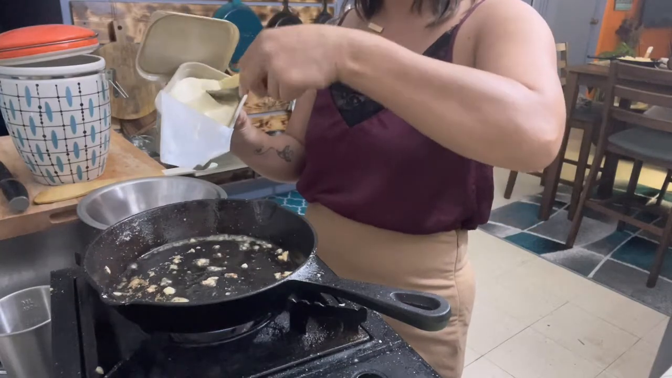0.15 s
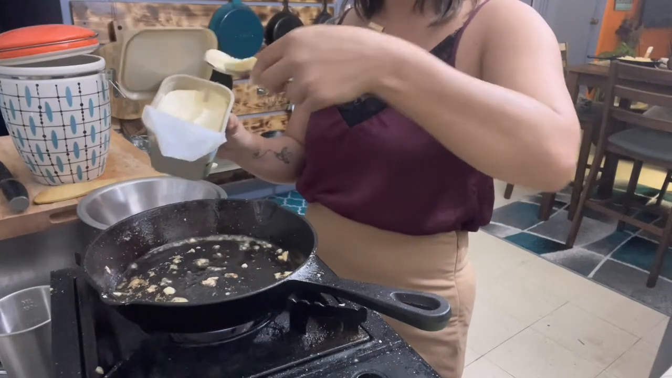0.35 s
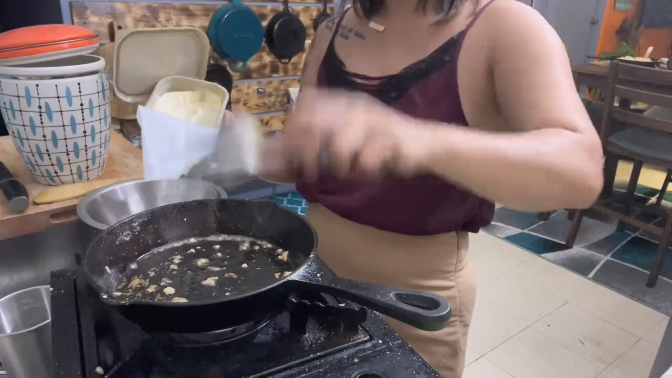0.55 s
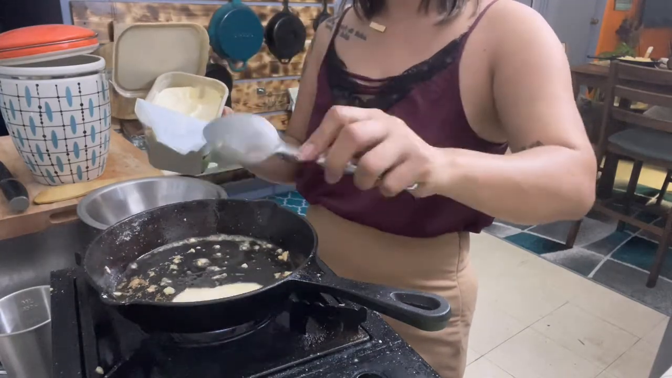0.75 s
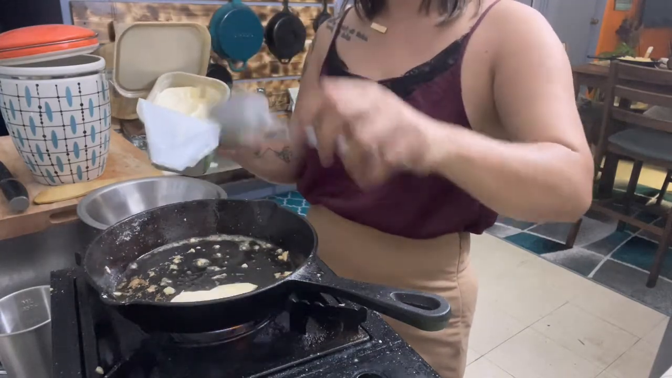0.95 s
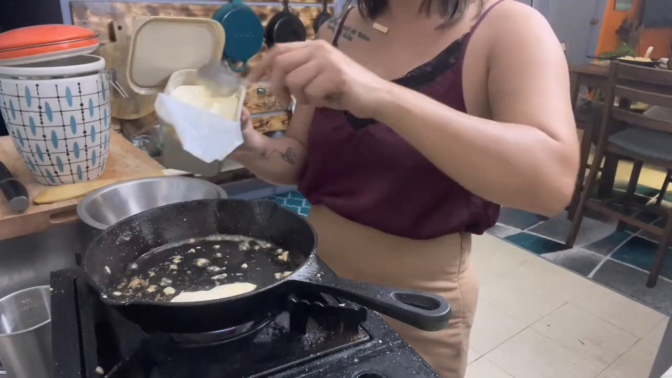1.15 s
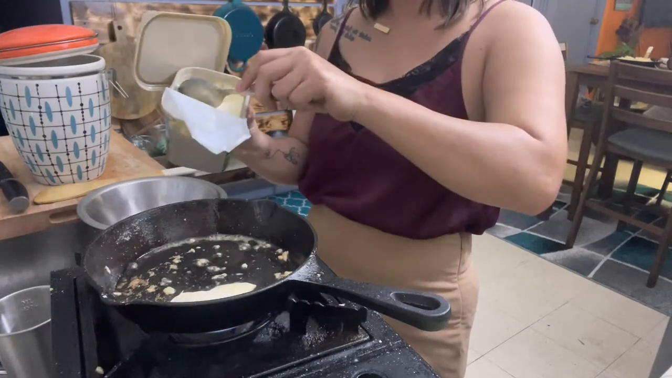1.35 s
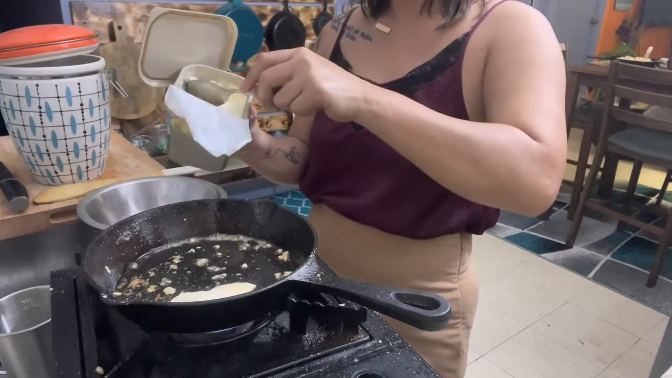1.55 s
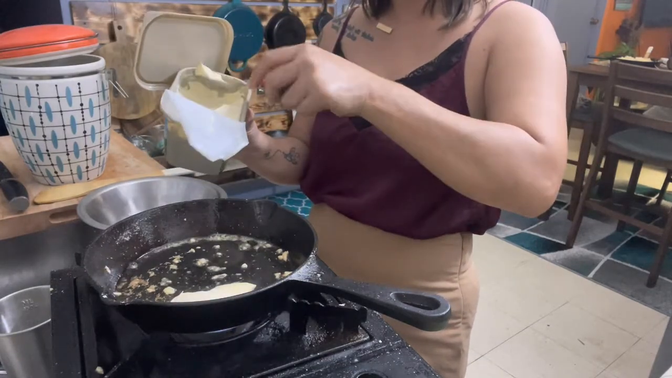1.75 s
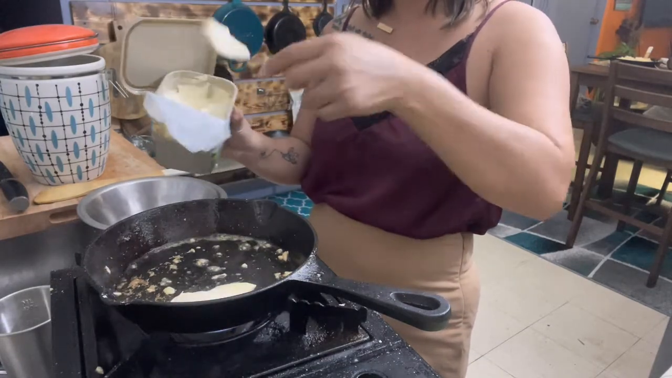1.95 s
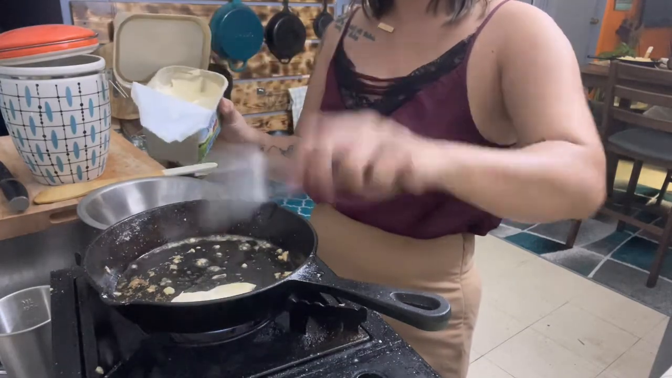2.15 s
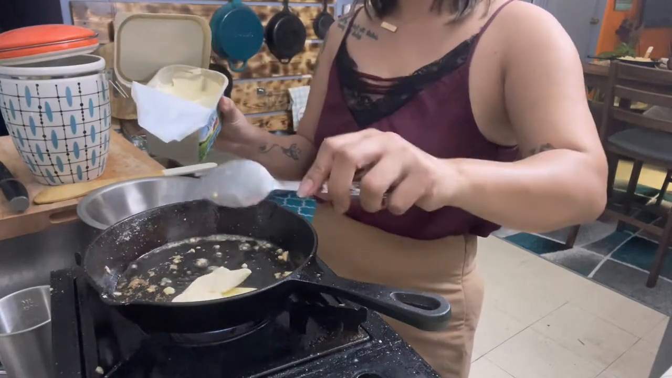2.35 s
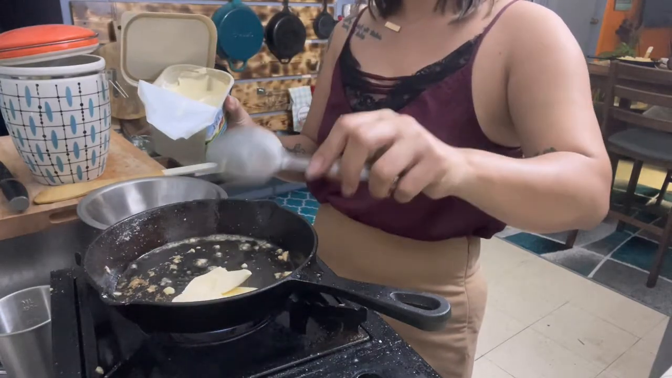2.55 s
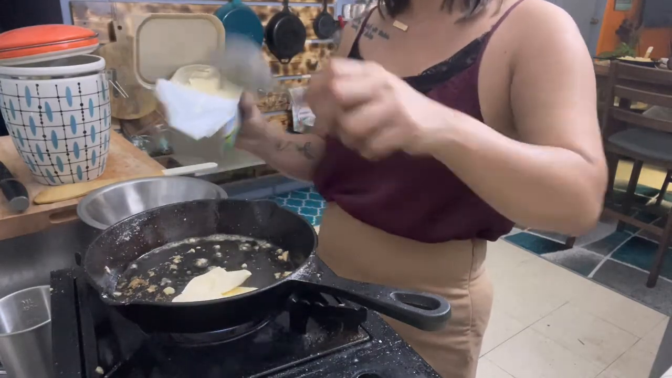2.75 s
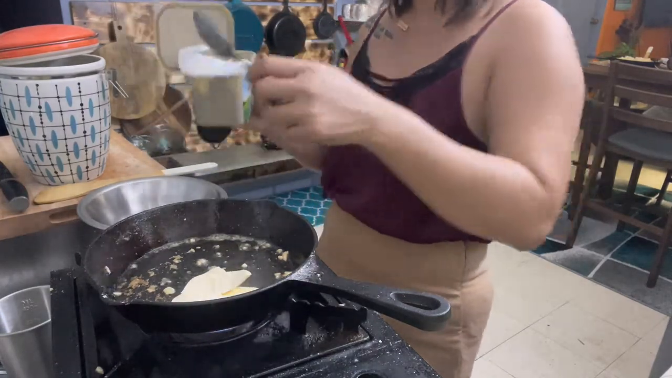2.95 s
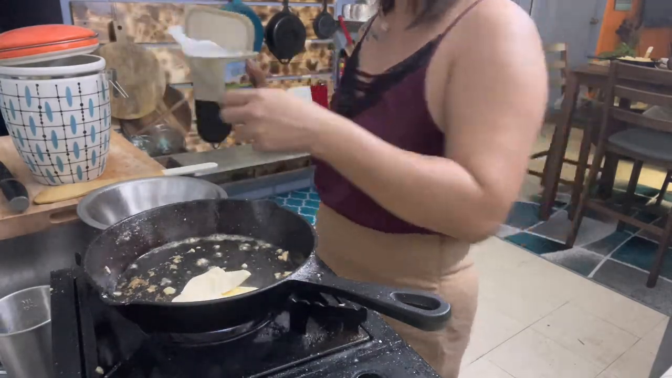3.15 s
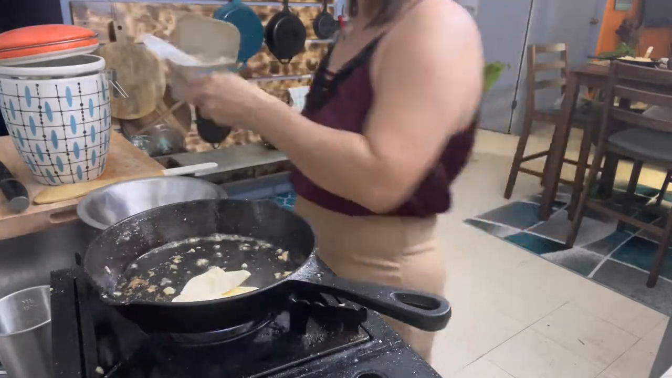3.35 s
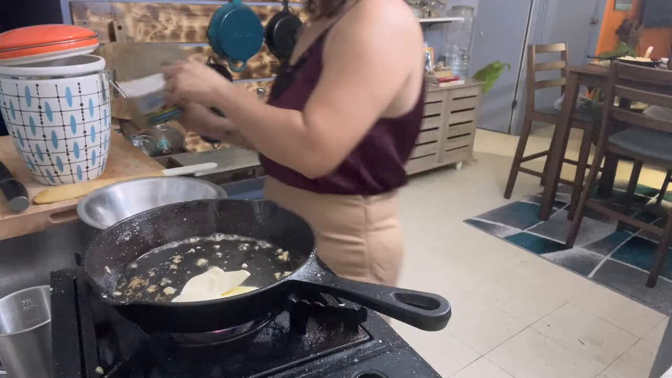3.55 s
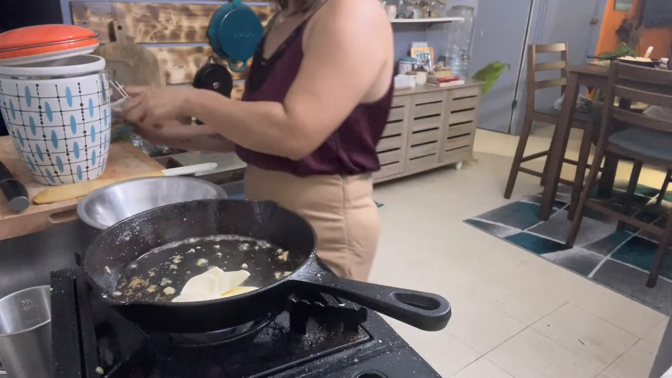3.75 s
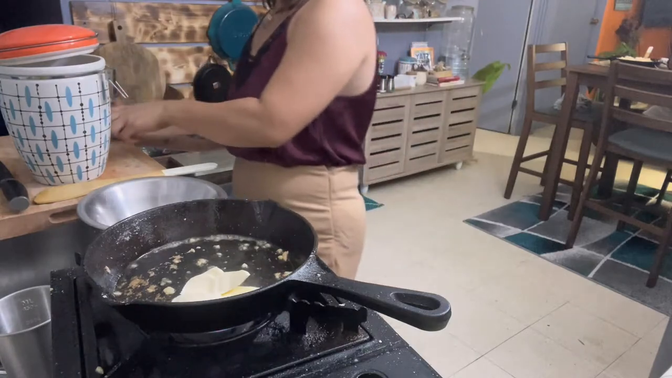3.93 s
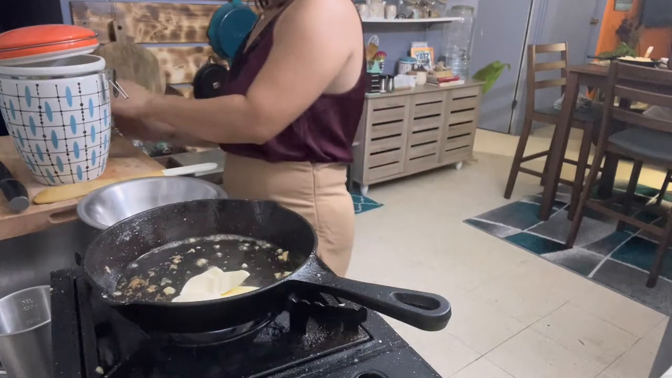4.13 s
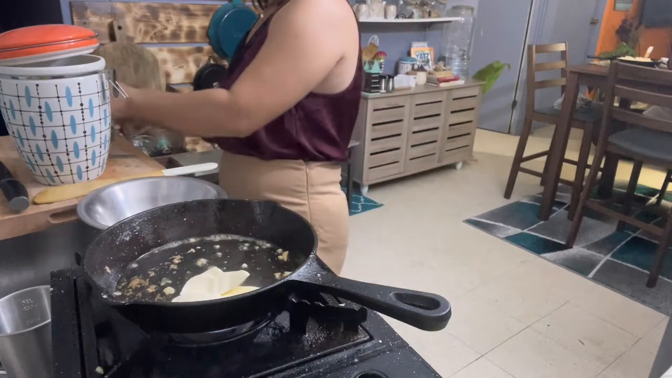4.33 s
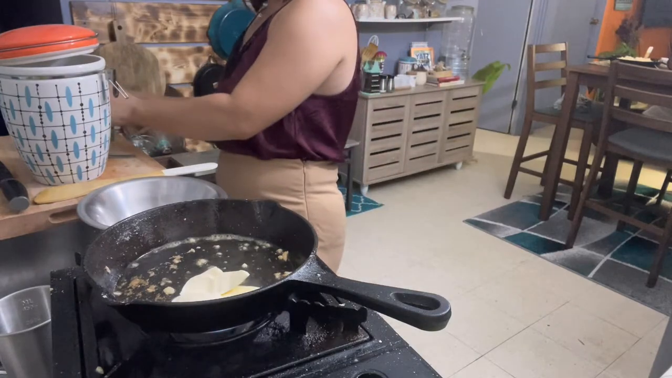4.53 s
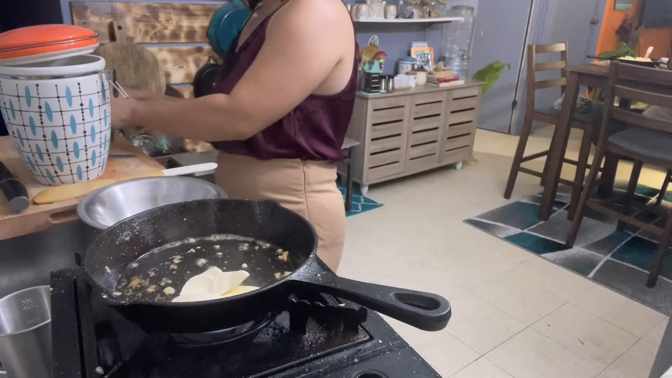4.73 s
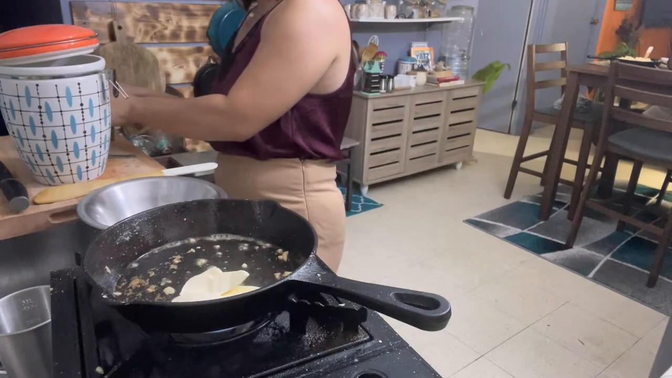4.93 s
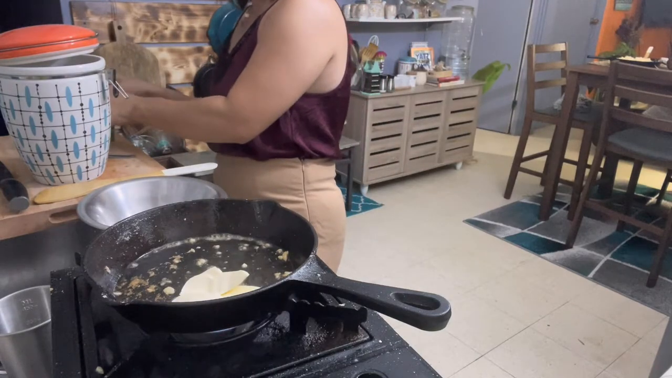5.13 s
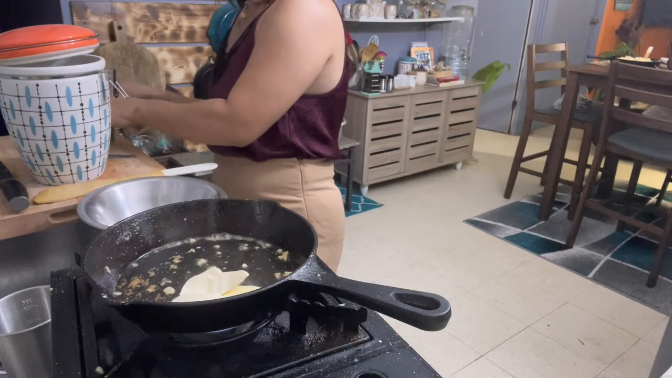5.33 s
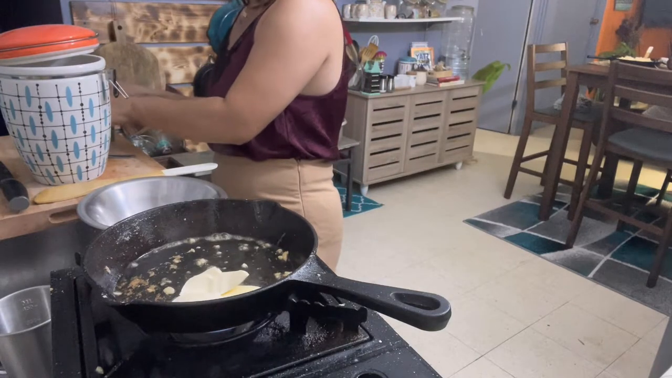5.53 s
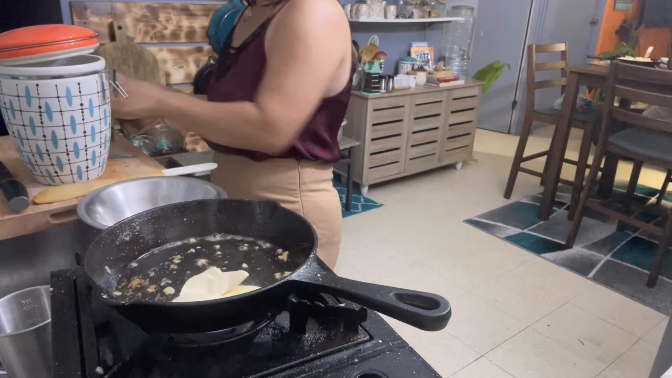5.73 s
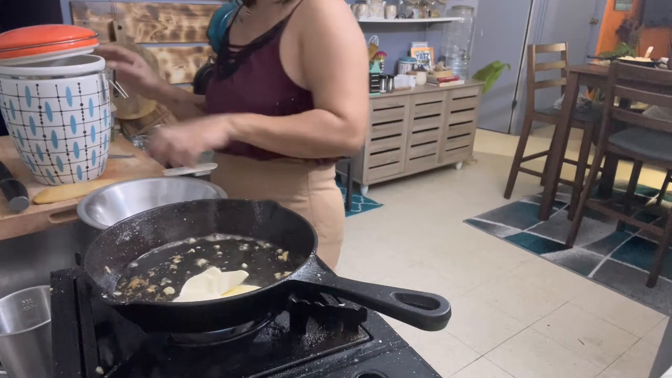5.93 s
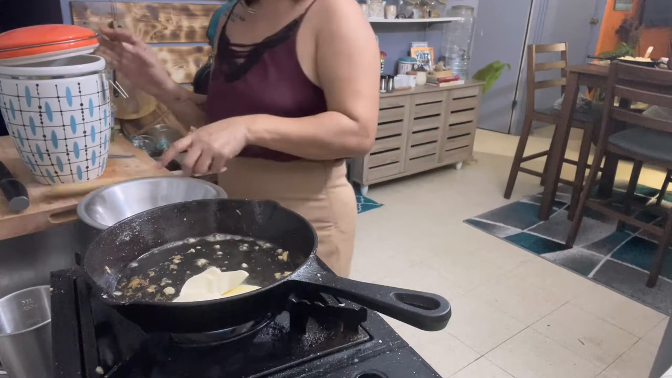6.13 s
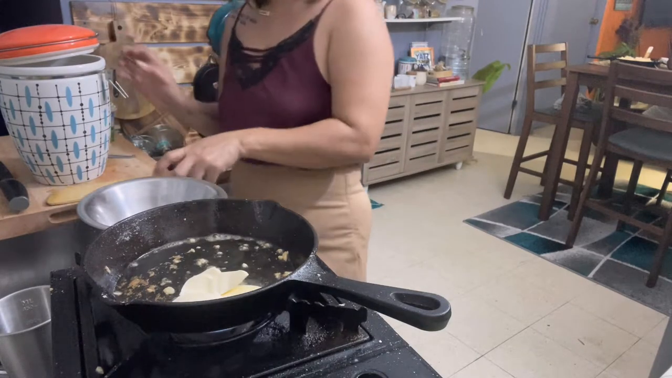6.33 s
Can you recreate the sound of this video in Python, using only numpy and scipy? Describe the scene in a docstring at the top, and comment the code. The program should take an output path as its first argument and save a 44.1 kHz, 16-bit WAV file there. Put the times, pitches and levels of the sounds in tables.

```python
"""Butter sizzles in a hot iron skillet: two lumps are dropped in, one after the other.
Their water boils off as a fine fizz, larger bubbles, spits and squeaks of steam.
A spoon scrapes a tub, things are set down on a wooden counter and an appliance hums.
Two close microphones hear each sound slightly out of step, plus the short echo of the kitchen."""
import sys
import numpy as np
from scipy import signal
from scipy.fft import rfft, irfft, next_fast_len
from scipy.io import wavfile
from scipy.ndimage import uniform_filter1d, map_coordinates

SR = 44100
rng = np.random.default_rng(int(sys.argv[2]) if len(sys.argv) > 2 else 0)


def digitize_waveform(pressure):
    """Quantize a signal to 16-bit integers and store it at the path in sys.argv[1].

    Rows of a 2-D input are taken as channels; values are limited to [-1, 1].
    """
    field = np.atleast_2d(pressure).T
    bounded = np.clip(field, -1, 1)
    quanta = np.round(bounded * 32767).astype(np.int16)
    wavfile.write(sys.argv[1], SR, quanta)


N = 281358

# Each row: time in seconds, then the levels in dB of fizz, steam, foam and deep bubbling.
BOIL_LEVELS = [(0, -65, -70, -65, -65), (.2, -64.5, -73, -69, -74), (.7, -65, -77, -74, -68.5),
               (.85, -48, -55, -60, -59), (.98, -40, -46.5, -52, -58), (1.25, -38, -44.5, -51, -53),
               (1.6, -37.5, -42.5, -49, -52.5), (1.85, -38, -41.5, -47.5, -50),
               (2.1, -37.5, -41.5, -45.5, -46.5), (2.29, -38, -40, -45.5, -48.5),
               (2.33, -36, -48, -41, -47), (2.75, -36.5, -47.5, -39.5, -45.5),
               (3.1, -36.5, -44, -41.5, -46), (3.45, -37, -46, -41, -44.5),
               (4.05, -37.5, -42.5, -43, -44.5), (4.5, -38, -43, -44.5, -45),
               (4.92, -37.5, -42.5, -43, -45), (5.5, -38, -44, -44, -45), (6.38, -38.5, -45, -45.5, -45)]
def sizzle():
    """Water boils out of the butter: small bubbles hiss high; steam, foam and big bubbles sound lower."""
    fizz_db, steam_db, foam_db, deep_db = curves(BOIL_LEVELS)
    high_db, low_db = flares()
    small, steam, froth, large = fizz(), steam_pocket(), foam(), deep_bubbles()
    surge = amp(0.58 * wobble(14) + 0.75 * wobble(45))  # the whole pan swells together
    boil = amp(fizz_db + high_db) * small
    boil += amp(steam_db + 1.2 * high_db + 0.5 * wobble(12)) * steam  # swings wider than the fizz
    boil += amp(foam_db + low_db + 0.6 * wobble(12)) * froth
    boil += amp(deep_db + low_db) * large
    return filtered(surge * boil, skillet_gain)


# The tone of the fizz, the finest fizz and the droplets. Each row: frequency in Hz, level in dB.
FIZZ_TONE = [(2500, -30), (3500, -7), (4500, -1.5), (5200, 0), (6000, -2.5), (7500, -2.5), (9000, -7),
             (11000, -25)]
FINE_TONE = [(6500, -25), (8000, -6), (9500, 0), (11000, -2), (14000, -4.5), (16000, -7)]
DROPLET_TONE = [(900, -25), (1800, -7), (2800, -11), (4000, -3), (8000, -10), (12000, 6.5), (16000, -23)]
# Each row: time in seconds, level of the finest fizz in dB compared with the main fizz.
FINE_LEVELS = [(0, 3.5), (.8, 1), (1.5, -2), (2.8, -1.5), (3.6, -4), (6.38, -5)]
def fizz():
    """Thousands of tiny bubbles pop each second while bursting droplets crackle."""
    small = bursts(FIZZ_TONE, per_second=7000, spread_db=4.5, hiss=0.54, clump_db=1)
    finest = bursts(FINE_TONE, per_second=9000, spread_db=4.5, hiss=0.84, clump_db=1)
    droplets = bursts(DROPLET_TONE, per_second=1400, spread_db=3, hiss=0.08, clump_db=1.5)
    return small + amp(curves(FINE_LEVELS)[0]) * finest + amp(-10) * droplets


# Each row: time in seconds, pitch of the steam in Hz, random scatter of that pitch in Hz.
STEAM_PITCHES = [(0, 3700, 80.4), (.85, 3700, 81), (1.1, 3900, 80), (1.22, 4090, 80), (1.4, 3950, 79.4),
                 (1.5, 3900, 80), (1.68, 3960, 79.6), (1.8, 3880, 80), (2.1, 3935, 81), (2.25, 3750, 79),
                 (2.4, 4000, 247), (3.5, 4100, 303), (4.2, 3900, 249), (5, 4050, 300.3), (6.38, 4000, 298)]
def steam_pocket():
    """Steam rings under the lump. Its pitch drifts as the lump shrinks and slides; foam blurs it."""
    width_hz = 217
    tone = [(20, 0), (width_hz / 2, 0), (width_hz, -6), (4 * width_hz, -26), (20000, -70)]
    bubbles = bursts(tone, per_second=2000, spread_db=3.5, hiss=0.55, clump_db=0.8)
    other_bubbles = bubbles[[1, 2, 0], ::-1]
    pitch, scatter = curves(STEAM_PITCHES)
    phase = 2 * np.pi * np.cumsum(pitch + scatter * wobble(600)) / SR
    return unit(bubbles * np.cos(phase) + other_bubbles * np.sin(phase))  # moved up to the pitch


# Each row: frequency in Hz, level of the foam in dB.
FOAM_TONE = [(1900, -22.5), (2300, -8), (2700, -2.5), (2950, -4), (3200, 0), (3500, -6), (4000, -41)]
def foam():
    """Foaming butter makes a soft, uneven hiss."""
    return bursts(FOAM_TONE, per_second=900, spread_db=1.5, hiss=0.9, clump_db=2)


# Each row: frequency in Hz, level of the big bubbles in dB.
DEEP_TONE = [(300, -10), (600, -5), (850, -4.5), (1070, -4), (1250, -5), (1700, -5), (2050, -2), (2400, -8),
             (3000, -54)]
def deep_bubbles():
    """Big bubbles under the lump pop with a lower sound."""
    return bursts(DEEP_TONE, per_second=1200, spread_db=3, hiss=0.65, clump_db=1.47)


# Each row: time in seconds, boost in dB of the high layers, then of the low ones, fall time in seconds.
WATER_FLARES = [(1.185, 2, 7, 0.034), (1.973, 2, 4, 0.014), (2.71, 2, 3, 0.006), (2.773, 5.5, 4.5, 0.03),
                (2.93, 0, 3, 0.2), (3.213, 2, 1, 0.015), (3.318, 5, 5, 0.0082), (3.928, 6.5, 10, 0.0063),
                (4.767, -2, -3.5, 0.034), (5.15, 1.5, 4, 0.031), (5.298, 3.5, 5, 0.021),
                (5.422, 2, 4, 0.02), (5.5, 2.5, 5.5, 0.027), (5.637, 2, 2, 0.026), (5.684, 4, 5, 0.055),
                (6.365, 2, 7.5, 0.013)]
def flares(rise_s=0.002):
    """Pockets of water burst: the boiling jumps up (once it dips), then settles. Gives boosts in dB."""
    t = np.arange(N) / SR
    boosts = np.zeros((2, N))
    for start, high_db, low_db, fall_s in WATER_FLARES:
        shape = np.exp(np.where(t < start, (t - start) / rise_s, (start - t) / fall_s))
        boosts += np.outer([high_db, low_db], shape)
    return boosts


# The pan's ringing notes and dull spots. Each row: frequency in Hz, width in Hz, boost in dB.
SKILLET_NOTES = [(1085, 110, 8.5), (1458, 40, 6.5), (2011, 54, 9.5), (2195, 93, 9), (2494, 20, 8),
                 (2914, 22, 9), (3566, 38, 8.5), (4060, 43, 3), (4100, 31, 2.5), (4200, 36, 1),
                 (4330, 31, 7.5), (4780, 400, -4), (4850, 45, 5), (5120, 29, 5), (5400, 97, 3),
                 (5600, 50, 5.5), (5580, 240, -2.5), (6345, 27, 8), (7650, 430, 5)]
def skillet_gain(hz):
    """The bubbles make the iron ring, so they are louder near its own notes."""
    return amp(sum(db / (1 + (2 * (hz - centre) / width) ** 2) for centre, width, db in SKILLET_NOTES))


# Each row: start in seconds, level in dB, bubble pitch in Hz, relative level of the low puff in dB.
FAT_SPITS = [(0.7588, -44, 3710, -14), (1.044, -20, 6000, -20), (1.1913, -16, 5200, -6),
             (1.4842, -26, 5520, -5), (1.8305, -29, 3870, -17), (1.9032, -29, 3870, -37),
             (1.9664, -12, 4200, -15), (2.0469, -12.5, 5010, -16), (2.1225, -13, 4080, -24),
             (2.3068, -32, 5530, -26), (2.874, -19, 4080, 1), (3.0084, -19, 3150, -24),
             (3.1304, -22, 3390, -24), (3.2286, -20, 4430, 3), (3.3173, -18, 6000, -20),
             (3.9236, -17, 4034, -11), (4.197, -14, 3830, -19), (4.2928, -14.5, 3790, -23),
             (4.5205, -9.5, 4300, -18), (4.697, -15, 5100, -3), (4.869, -37, 4140, -5),
             (4.4148, -33, 6000, -20), (4.9875, -14, 6100, -11), (5.24, -19, 3900, -18),
             (5.2948, -24, 5000, -16), (5.4086, -26, 6000, -13), (5.415, -17, 4060, -20),
             (5.457, -22, 3800, -20), (5.5215, -18, 4050, -14), (5.6054, -23, 5280, -5),
             (5.723, -16, 4210, -16), (5.6365, -17, 3800, -6), (5.7775, -21, 5000, -18),
             (5.7323, -25, 6000, -20), (6.0521, -29, 6000, -18), (5.8193, -34, 3860, -22),
             (5.8719, -13, 4100, -22), (6.2962, -19, 6000, -2)]
def spits():
    """Single bubbles burst and spit fat."""
    return clicks(FAT_SPITS, ring_db=1, cycles=11.7, crack_db=-8, crack_fade_s=0.0029)


# Each row: start in seconds, level in dB, pitch in Hz, relative level of the low puff in dB.
STEAM_SQUEAKS = [(2.605, -24, 2920, -22), (2.655, -29, 2920, -20), (2.707, -15.5, 2900, -5.5),
                 (2.72, -28.5, 2990, -25)]
def squeaks():
    """Steam squeaks out from under the second lump."""
    return clicks(STEAM_SQUEAKS, ring_db=0, cycles=120, crack_db=-10, crack_fade_s=0.003)


# Each row: time in seconds, level of the scraping in dB.
SCRAPE_LEVELS = [(0, -55), (.04, -51), (.13, -55), (.2, -67), (.65, -88), (.67, -46), (.74, -67),
                 (.85, -84)]
# Each row: frequency in Hz, level of the tub wall's ring in dB.
TUB_TONE = [(600, -25), (950, -1), (1150, 3), (1400, -8), (2000, -15.5)]
def scrape():
    """The spoon sticks and slips, and each tiny jerk rings the tub wall."""
    jerks = bursts(TUB_TONE, per_second=1500, spread_db=3, hiss=0.5, clump_db=3)
    return amp(curves(SCRAPE_LEVELS)[0]) * jerks


# Each row: start in seconds, level in dB, pitch in Hz, relative level of the low puff in dB.
TUB_TICKS = [(.04, -32, 3880, -26), (.064, -32, 3030, -19), (.132, -37, 4500, -13), (.167, -30, 7200, -19),
             (.182, -32, 5000, -18), (.2254, -23, 11500, -24), (.2384, -26.5, 5000, -7),
             (.281, -26, 9000, -23), (.286, -21, 4270, -17), (.295, -20, 8050, -9.5),
             (.306, -36, 9000, -22), (.332, -27, 10900, -21), (.339, -32, 11000, -25),
             (.383, -35, 4550, -20), (.406, -36, 12000, -25), (.489, -34, 7000, -20),
             (.494, -23.5, 4900, -14), (.499, -24.5, 5500, -7.5), (.5347, -21, 12600, -22),
             (.5355, -35, 4400, -22), (.5935, -33, 7490, -14), (.6655, -27, 12600, -28),
             (.6685, -35, 4900, -13)]
def ticks():
    """Spoon and foil tick at the tub."""
    return clicks(TUB_TICKS, ring_db=-2.5, cycles=8.2, crack_db=-13.5, crack_fade_s=0.0069)


# Each row: start in seconds, level in dB, brightness in dB per octave, multiplier for the fade time.
COUNTER_KNOCKS = [(0.285, -30.5, -13.5, 0.37), (3.59, -29, -6, 0.8), (3.75, -26.5, -17, 0.58),
                  (3.923, -30, -12, 0.47), (3.9812, -14, -3, 0.8), (4.003, -22, -4, 0.69),
                  (4.028, -24.5, -5.5, 0.74), (4.089, -26.5, 5.5, 0.85), (4.1112, -16, 8, 0.54),
                  (4.136, -25, 9, 0.52), (4.161, -26, 6, 0.46), (4.181, -40, 6, 0.5),
                  (5.409, -24, -20.5, 0.44), (5.637, -24, -9, 0.29)]
# Each row: pitch in Hz, level in dB, seconds to fade by 60 dB.
OBJECT_NOTES = [(540, -23.5, 0.081), (727, -11, 0.11), (834, -5.5, 0.059), (972, -2.5, 0.064),
                (1030, -12, 0.1), (1354, -2, 0.11), (1490, -11, 0.039), (1766, -12.5, 0.11),
                (2120, -11, 0.11), (2610, -5, 0.049), (3120, -10.5, 0.051), (3380, -20, 0.04)]
def counter_knocks():
    """Things ring briefly as they are set down on the counter."""
    return knocks(COUNTER_KNOCKS, OBJECT_NOTES, attack_s=0.0012)


# Each row: start in seconds, level in dB, brightness in dB per octave, multiplier for the fade time.
SPATULA_KNOCKS = [(6.198, -26, -1, 1), (6.206, -28, 3, 0.69), (6.211, -21.5, -7, 0.67),
                  (6.228, -36, -6, 0.88), (6.252, -40, -4, 1)]
# Each row: pitch in Hz, level in dB, seconds to fade by 60 dB.
SPATULA_NOTES = [(584, -13, 0.054), (800, 4.5, 0.039), (1057, -1, 0.077), (1210, -6, .05),
                 (1350, -3, 0.047)]
def spatula():
    """A wooden spatula knocks as it is picked up."""
    return knocks(SPATULA_KNOCKS, SPATULA_NOTES, attack_s=0.003)


# Each row: start in seconds, level in dB, brightness in dB per octave.
COUNTER_THUDS = [(3.749, -22.5, -3), (3.988, -26.5, -1), (4.047, -21, -3), (4.119, -21.5, -3.5),
                 (5.414, -32.5, -0.5), (6.204, -31.5, 9), (6.222, -44, 17.5)]
# Each row: pitch in Hz, level in dB, seconds to fade by 60 dB.
COUNTER_NOTES = [(105.1, -15, 0.66), (128.8, -3, 0.22), (148.7, -12.5, 0.31), (263, -24, 1),
                 (319, -16.5, 0.39), (402, -26.5, 0.38)]
def thuds():
    """The bumped counter top shakes with low, uneven notes."""
    out, t = np.zeros(N), np.arange(SR // 2) / SR
    hz, note_db, fade_s = np.transpose(COUNTER_NOTES)[:, :, None]
    for start, db, brightness in COUNTER_THUDS:
        drift = 0.03 * np.cumsum(rng.standard_normal((len(hz), len(t))), axis=1)
        fade = amp(note_db + brightness * np.log2(hz / 130) - 60 * t / fade_s)
        swing = fade * np.sin(2 * np.pi * hz * t + drift)
        add(out, start, amp(db) * swing.sum(0) * (1 - np.exp(-t / 0.004)))
    return out


# Each row: base pitch in Hz, level in dB, offset in Hz, time in seconds when in step with the base.
HUM_TONES = [(57.267, -49.3, 0, 0), (57.267, -50.1, 1.419, .078), (57.267, -52.5, 1.688, .408),
             (57.267, -60.6, .855, .659), (80.688, -51.2, 0, 0), (80.688, -55.9, -2.087, .129),
             (80.688, -65.9, -1.861, .081)]
def hum():
    """An appliance hums: close low tones throb as they drift in and out of step."""
    t = np.arange(N) / SR
    return sum(np.sqrt(2) * amp(db) * np.sin(2 * np.pi * (hz * t + offset_hz * (t - in_step_s)))
               for hz, db, offset_hz, in_step_s in HUM_TONES)


# Each row: frequency in Hz, relative level of the background in dB.
AIR_TONE = [(60, -24), (100, -3.5), (135, 2), (180, -12.5), (230, -9), (330, -4), (450, -9.5), (700, -16),
            (1100, -18), (1800, -29), (3000, -45), (6000, -70)]
def air():
    """The dull background noise of the kitchen."""
    noise = rng.standard_normal((3, N))
    return amp(-53.5) * unit(filtered(noise, lambda hz: amp(along(AIR_TONE, hz))))


def echoes(x, near_fade_s=0.05, room_fade_s=0.42, room_db=-8, size=1024):
    """Sounds come from many spots, so each short piece gets its own echo at each microphone."""
    t = np.arange(8 * size) / SR
    pieces = np.lib.stride_tricks.sliding_window_view(np.pad(x, (size, 2 * size)), 2 * size)[::size]
    pieces = pieces * np.sin(np.pi * np.arange(2 * size) / (2 * size))
    decay = amp(-60 * t / near_fade_s) + amp(room_db - 60 * t / room_fade_s)
    tails = rng.standard_normal((2, len(pieces), len(t))) * decay / np.linalg.norm(decay)
    echoed = irfft(rfft(pieces, 10 * size) * rfft(tails, 10 * size), 10 * size)
    positions = (np.arange(len(pieces))[:, None] * size + np.arange(10 * size)).ravel()
    return np.array([np.bincount(positions, side.ravel())[size:size + N] for side in echoed])


# Each row: frequency in Hz, how far the left microphone is ahead in radians.
LEFT_LEAD = [(0, 0), (300, .2), (800, 2), (1550, 1.6), (2930, 4.3), (4300, 5.4), (5700, 6.7), (6400, 6.4),
             (7100, 4.4), (7800, 4.3), (8400, 3.3), (9200, 3.0), (11200, .15), (12000, -.15), (13800, -3.0),
             (14900, -3.3), (16500, -5.4)]
# Each row: frequency in Hz, share of the energy that arrives directly.
DIRECT_SHARE = [(90, .995), (130, .92), (300, .55), (900, .42), (3000, .47), (6500, .45), (8300, .87),
                (16000, .85)]
# Each row: frequency in Hz, how much louder the left is in dB.
LEFT_BOOST = [(60, 1), (200, 3), (400, 2.5), (800, 5.5), (1500, 1.8), (4400, 2.1), (5700, -.8), (9000, 0)]
def microphones(rows):
    """Row 0 reaches both microphones, slightly out of step; rows 1 and 2 are scattered, one to each."""
    side = np.array([[.5], [-.5]])
    def direct_path(hz):
        lead = np.interp(hz, *np.transpose(LEFT_LEAD))
        return np.sqrt(along(DIRECT_SHARE, hz)) * np.exp(1j * side * lead)
    direct = filtered(rows[0], direct_path)
    scattered = filtered(rows[1:], lambda hz: np.sqrt(1 - along(DIRECT_SHARE, hz)))
    return filtered(direct + scattered, lambda hz: amp(side * along(LEFT_BOOST, hz)))


def bursts(tone, per_second, spread_db, hiss, clump_db):
    """Pops of unequal size come in clumps over a hiss. Gives the three rows that microphones() takes."""
    when, chance, sign = rng.random((3, 3, int(per_second * N / SR)))
    sizes = amp(-spread_db * np.log(chance + 0.0017)) * np.sign(sign - .5)
    pops = unit(np.array([np.bincount((at * N).astype(int), size, N) for at, size in zip(when, sizes)]))
    mix = np.sqrt(1 - hiss) * pops + np.sqrt(hiss) * rng.standard_normal((3, N))
    clumps = amp(clump_db * wobble(70))
    return unit(filtered(mix * clumps, lambda hz: amp(along(tone, hz))))


def clicks(table, ring_db, cycles, crack_db, crack_fade_s):
    """Each click is a sharp crack, a fading tone and a short low puff."""
    out, t = np.zeros(N), np.arange(SR // 40) / SR
    band = signal.butter(2, [600, 2300], "band", fs=SR, output="sos")
    for start, db, hz, puff_db in table:
        crack_noise, puff_noise = rng.standard_normal((2, len(t)))
        tone = amp(ring_db - 60 * t * hz / cycles) * np.sin(2 * np.pi * hz * t)
        treble = crack_noise - uniform_filter1d(crack_noise, size=9)
        crack = amp(crack_db - 60 * t / crack_fade_s) * treble
        puff = amp(puff_db - 60 * t / 0.0059) * unit(signal.sosfilt(band, puff_noise))
        add(out, start, amp(db) * (tone + crack + puff))
    return out


def knocks(table, notes, attack_s, clack_db=-4.5, clack_fade_s=0.06):
    """Each knock rings with its own loudness and brightness, with blurred notes and a short clack."""
    out, t = np.zeros(N), np.arange(SR // 3) / SR
    hz, note_db, fade_s = np.transpose(notes)[:, :, None]
    band = signal.butter(3, [500, 2300], "band", fs=SR, output="sos")
    for start, db, brightness, stretch in table:
        level = note_db + brightness * np.log2(hz / 1000) + 2 * rng.standard_normal(hz.shape)
        blur = 0.075 * np.cumsum(rng.standard_normal((len(hz), len(t))), axis=1)
        ring = amp(level - 60 * t / (fade_s * stretch)) * np.sin(2 * np.pi * hz * t + blur)
        noise = unit(signal.sosfilt(band, rng.standard_normal(len(t))))
        clack = amp(clack_db + min(brightness, 0) - 60 * t / clack_fade_s) * noise
        add(out, start, amp(db) * (ring.sum(0) + clack) * (1 - np.exp(-t / attack_s)))
    return out


def amp(db):
    """Turns dB into a multiplier."""
    return 10 ** (np.asarray(db) / 20)


def unit(x):
    """Scales a sound to an average power of 1."""
    return x / np.sqrt(np.mean(x ** 2) + 1e-20)


def along(points, hz):
    """Reads between (Hz, value) points, with octaves evenly spaced."""
    frequencies, values = np.transpose(points)
    return np.interp(np.log(hz + 1), np.log(frequencies + 1), values)


def curves(rows):
    """One value per sample for each column after the time."""
    times, *columns = np.transpose(rows)
    return [np.interp(np.arange(N) / SR, times, column) for column in columns]


def wobble(rate):
    """A smooth curve through `rate` random points a second."""
    return map_coordinates(rng.standard_normal(int(N * rate / SR) + 4), [np.arange(N) * rate / SR])


def filtered(x, response):
    """Multiplies each frequency in x by response(hz)."""
    size = next_fast_len(N + SR // 2)
    return irfft(rfft(x, size) * response(np.fft.rfftfreq(size, 1 / SR)), size)[..., :N]


def add(track, start, sound):
    """Mixes a sound in at `start` seconds."""
    part = track[round(start * SR):][:len(sound)]
    part += sound[:len(part)]


def scene():
    """Pan, tub, counter and kitchen at the two microphones."""
    noises = sizzle() + scrape() + air()
    sharp = spits() + ticks()
    soft = squeaks() + hum()
    sharp += counter_knocks() + spatula()
    soft += thuds()
    room = echoes(soft + amp(-2) * sharp)  # sharp, near sounds stir the room less
    return microphones(noises + np.vstack([sharp + soft, room]))


def record(dry):
    """Cuts off the very highest treble."""
    return filtered(dry, lambda hz: hz < 15750)


dry = scene()
out = record(dry)
digitize_waveform(out)
```